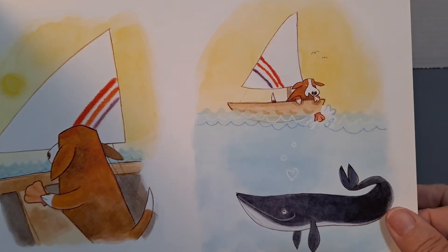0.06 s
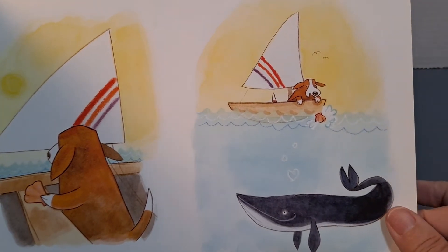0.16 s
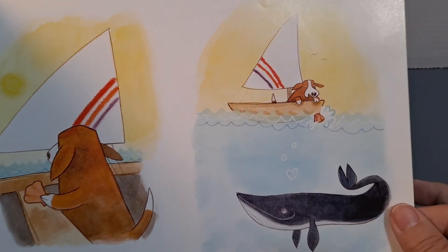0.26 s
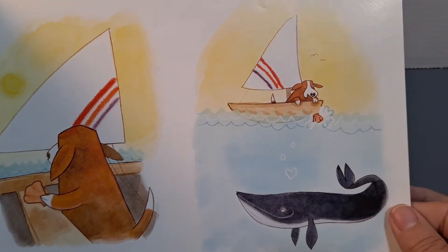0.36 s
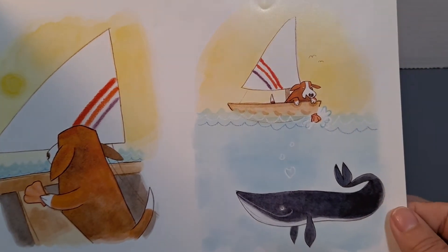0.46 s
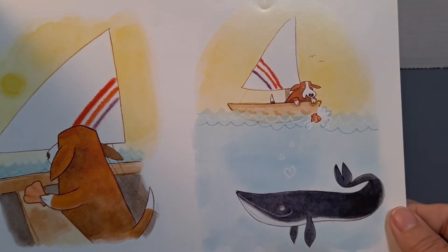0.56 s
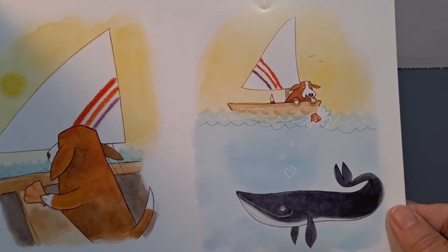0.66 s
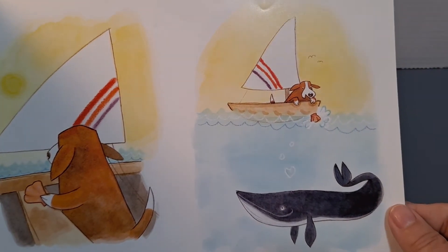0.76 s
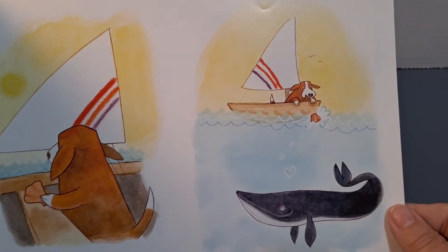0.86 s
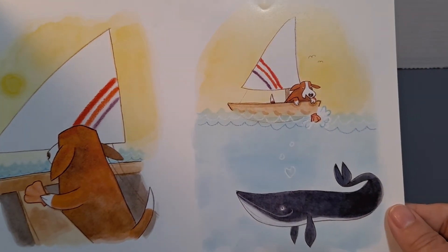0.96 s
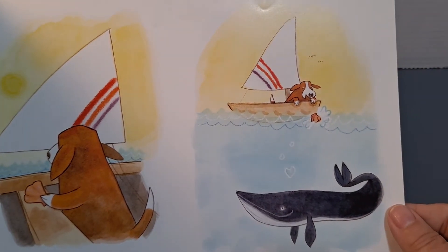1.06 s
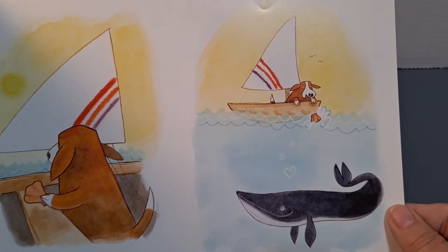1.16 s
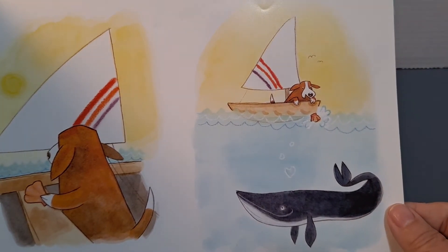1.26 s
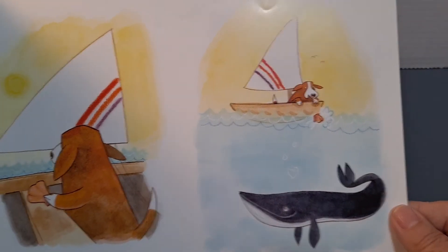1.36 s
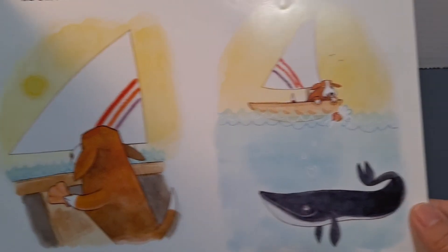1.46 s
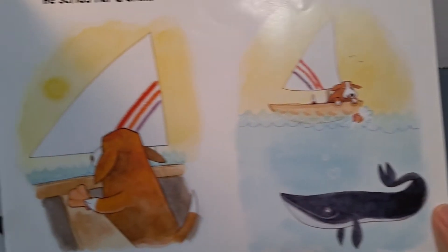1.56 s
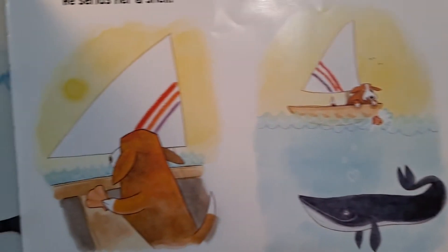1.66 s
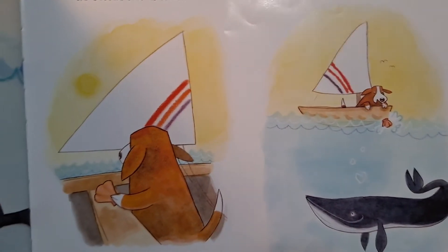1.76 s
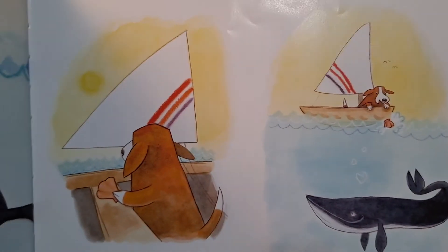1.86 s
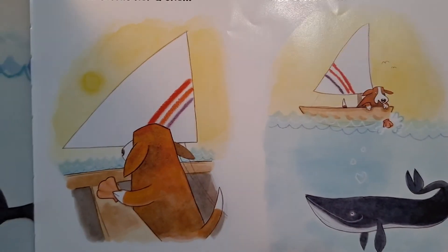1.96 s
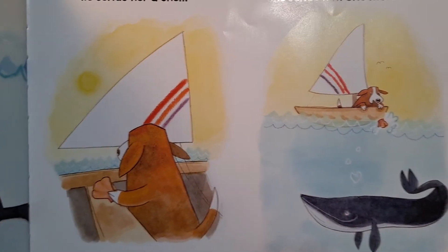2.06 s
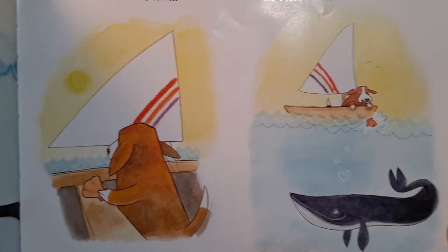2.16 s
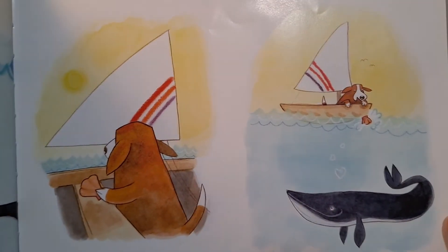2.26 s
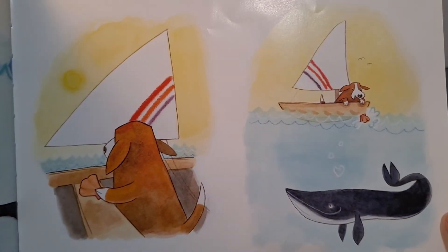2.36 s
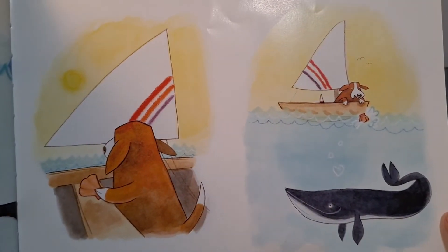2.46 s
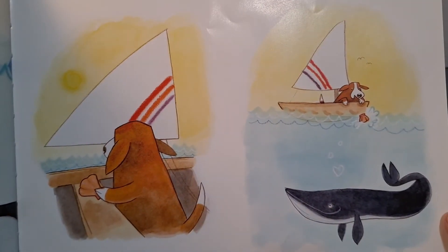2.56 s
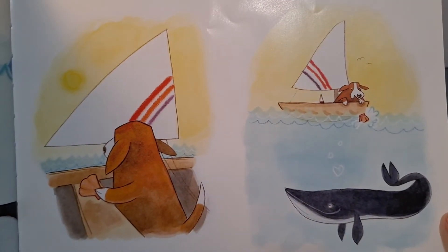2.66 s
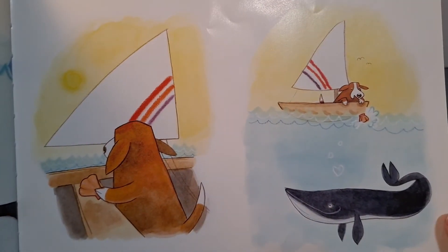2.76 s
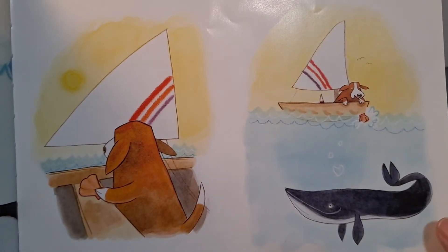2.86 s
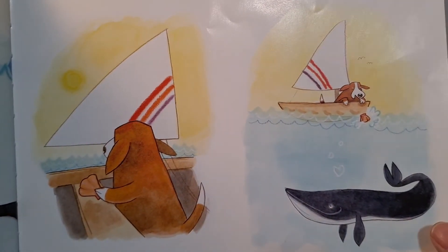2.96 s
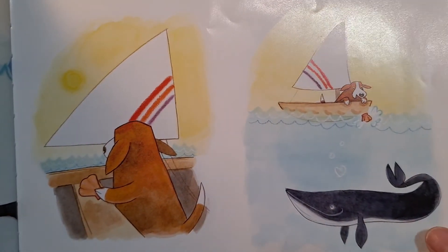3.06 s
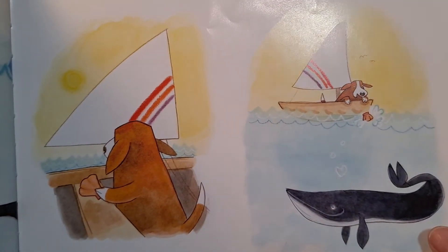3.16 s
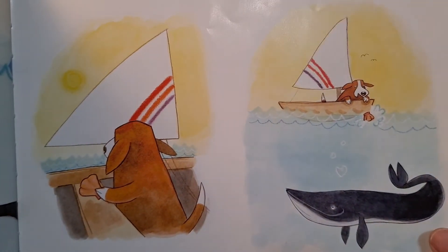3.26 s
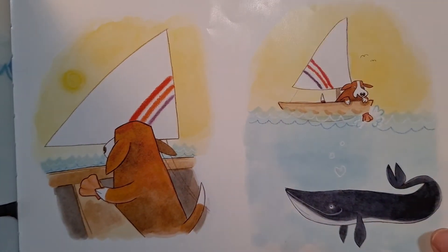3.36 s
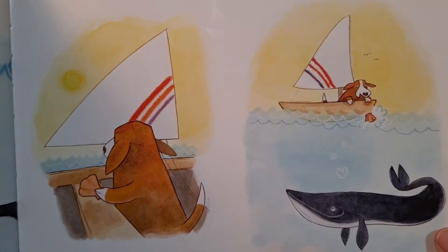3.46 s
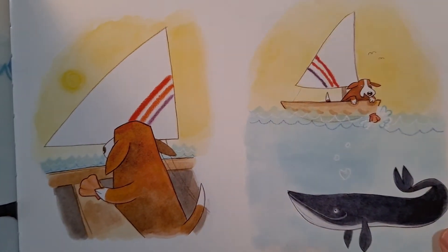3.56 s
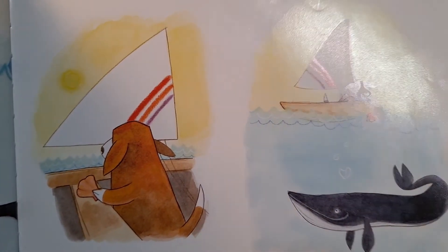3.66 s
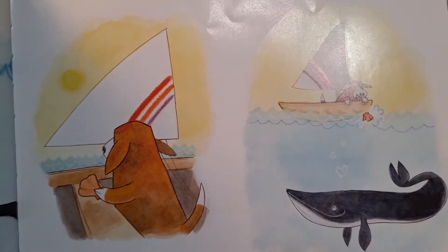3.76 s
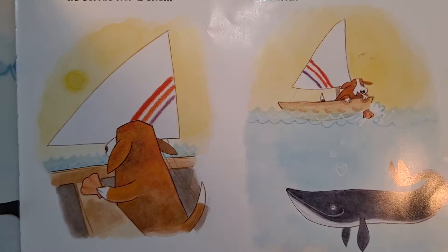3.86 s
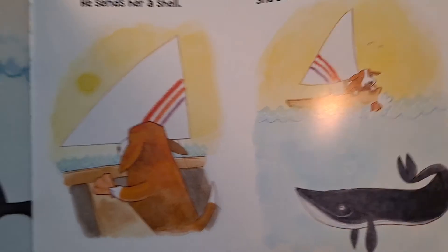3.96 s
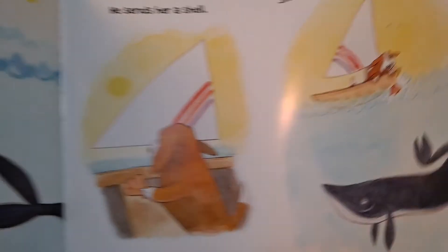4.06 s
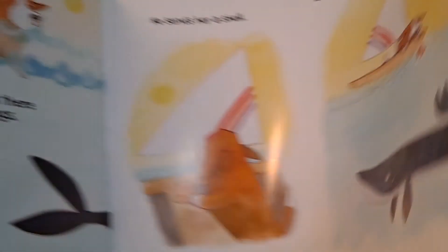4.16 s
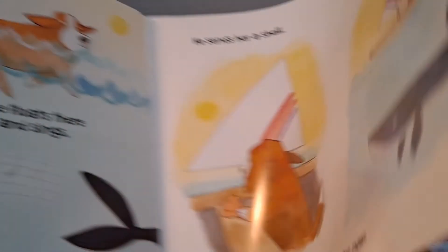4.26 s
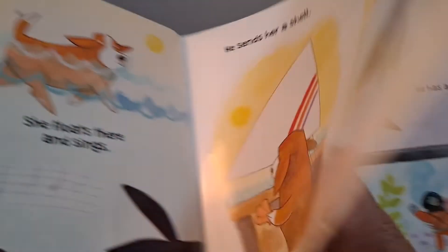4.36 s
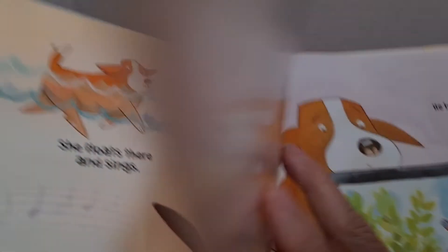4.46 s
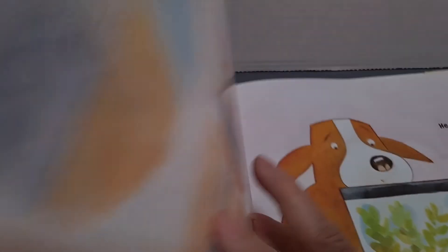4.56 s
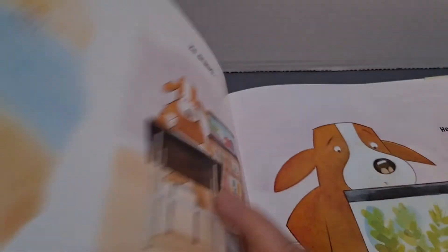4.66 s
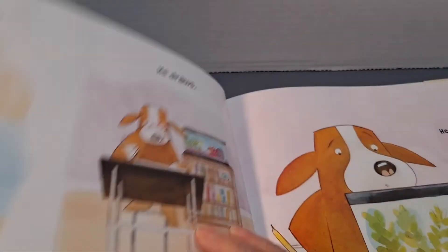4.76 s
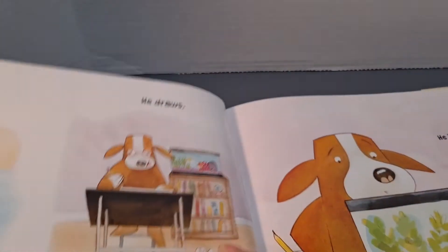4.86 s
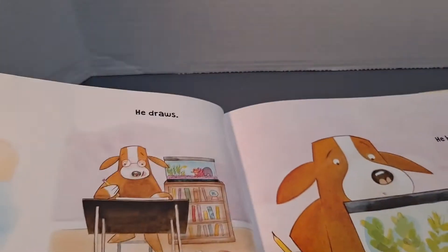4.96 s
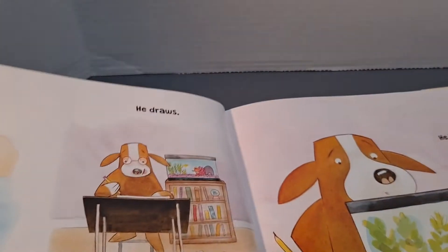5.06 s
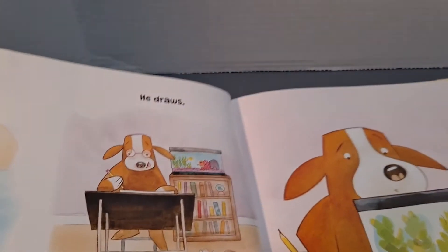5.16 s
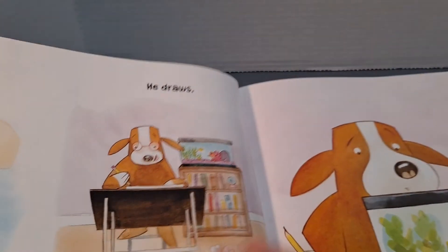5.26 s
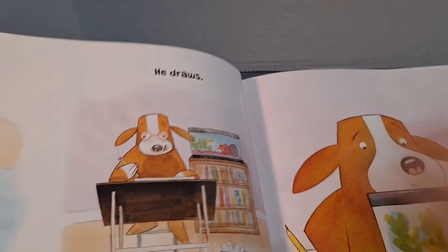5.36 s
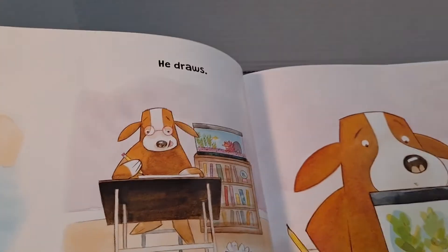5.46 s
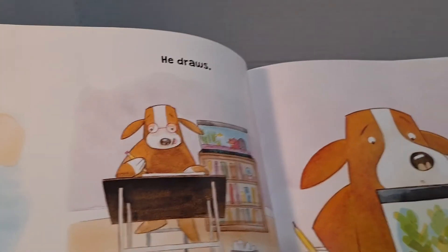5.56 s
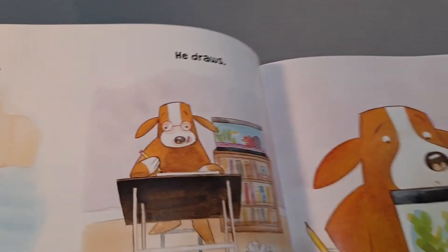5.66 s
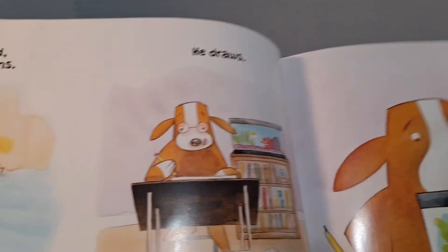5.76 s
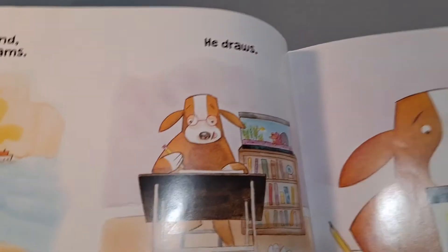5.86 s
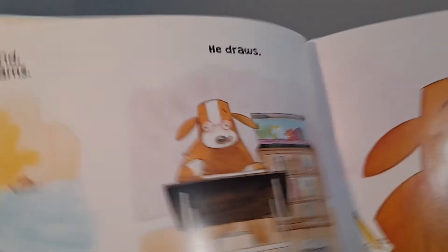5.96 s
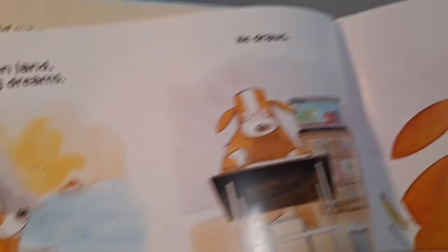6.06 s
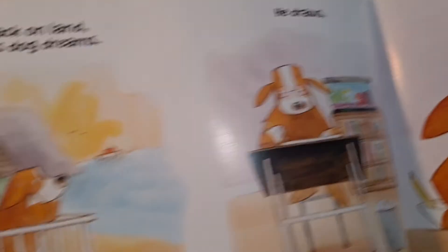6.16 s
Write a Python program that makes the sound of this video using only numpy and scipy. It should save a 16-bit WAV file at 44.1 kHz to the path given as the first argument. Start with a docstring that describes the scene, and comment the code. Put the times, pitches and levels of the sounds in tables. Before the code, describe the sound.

A picture book is handled very close to a stereo microphone in a small quiet room. Quick dry binding ticks come first, then two thin page-edge flicks and a soft paper slide. After a near-silent pause the spine crackles again, pages hiss past each other, and a turn lands with sharp flicks, a low cover thump and papery snaps, settling into faint rustle.

```python
"""A picture book is handled close to a two-port microphone: its binding ticks and creaks, page edges flick
and the cover is thumped. Snaps are short noise bursts that ring resonances; creaks are noise in uneven clumps.
Glossy pages slide over each other with a hiss of filtered noise, and a small room answers the snaps.
Underneath lie the low rumble of the house, a rumble through the microphone stand and the microphone's hiss."""
import sys
import numpy as np
from scipy import signal
from scipy.fft import rfft, irfft, next_fast_len
from scipy.io import wavfile
from scipy.ndimage import uniform_filter1d, map_coordinates

SR = 44100
rng = np.random.default_rng(int(sys.argv[2]) if len(sys.argv) > 2 else 0)


def master_out(mix):
    """Clip the mix to full scale and print it as 16-bit PCM to the path in sys.argv[1]."""
    frames = np.transpose(np.atleast_2d(mix))
    ceiling = np.clip(frames, -1, 1)
    pcm = np.round(ceiling * 32767).astype(np.int16)
    wavfile.write(sys.argv[1], SR, pcm)


N = 274302

# resonances of the binding: (f/Hz, width/Hz, level/dB)
BINDING_MODES = [(832, 140, -3), (1300, 1080, -4.5), (1525, 208, 3.5), (1939, 350, -5), (2430, 190, -0.5),
                 (3030, 230, -3.5)]
# resonances of the cover: (f/Hz, width/Hz, level/dB)
COVER_MODES = [(176, 104, 2.5), (312, 139, 0), (540, 170, -4), (697.5, 56, 1.5), (1094, 150, -2.5)]


def amp(db):
    """Gain of a level in dB."""
    return 10 ** (np.asarray(db) / 20)


def unit(x):
    """x scaled to an average strength (rms) of 1."""
    return x / np.sqrt(np.mean(x ** 2) + 1e-20)


def peak(x):
    """x scaled so that its highest peak is 1."""
    return x / np.abs(x).max()


def along(points, hz):
    """Values at hz, read between (f/Hz, value) points on a log axis."""
    f, v = np.transpose(points)
    return np.interp(np.log(hz + 1), np.log(f + 1), v)


def curves(rows):
    """One value per sample for each column after the time."""
    s, *cols = np.transpose(rows)
    return [np.interp(np.arange(N) / SR, s, c) for c in cols]


def wobble(rate):
    """A smooth random curve through rate random points a second."""
    points = rng.standard_normal(int(N * rate / SR) + 4)
    return map_coordinates(points, [np.arange(N) * rate / SR])


def filtered(x, response):
    """x times a response (real or complex) that depends on frequency."""
    m = next_fast_len(x.shape[-1] + SR // 4)
    spectrum = rfft(x, m) * response(np.fft.rfftfreq(m, 1 / SR))
    return irfft(spectrum, m)[..., :x.shape[-1]]


def modes(table):
    """Response of resonances (f/Hz, width/Hz, level/dB) that ring after a push; their signs alternate."""
    def response(f):
        return sum((-1) ** k * amp(db) * 1j * f * w / (c * c - f * f + 1j * f * w)
                   for k, (c, w, db) in enumerate(table))
    return response


def pair(alike):
    """Left and right white noise that share a part: alike is their correlation."""
    a, b = rng.standard_normal((2, N))
    turn = np.arccos(np.clip(alike, 0, 1)) / 2
    shared, own = np.cos(turn) * a, np.sin(turn) * b
    return np.array([shared + own, shared - own])


def sides(pan_db):
    """Gains of the left and right port; pan_db is left over right."""
    return amp(np.array([pan_db, -pan_db]) / 2)


def strokes(rows):
    """Each stroke rises, holds and dies; their powers add, and the loudest dominates the other columns."""
    step = 64  # samples between computed points
    start, rise, hold, t60, db, *cols = np.transpose(rows)[:, :, None]
    t = np.arange(0, N + step, step) / SR - start
    rising = np.clip(t / np.maximum(rise, .002), 0, 1)
    fall_db = 60 * np.clip(t - rise - hold, 0, 2) / np.maximum(t60, .02)
    power = (rising * amp(db - fall_db)) ** 2 + 1e-14
    total = power.sum(0)

    def full(v):
        return np.interp(np.arange(N), np.arange(len(v)) * step, v)
    return [full(np.sqrt(total))] + [full((power * c).sum(0) / total) for c in cols]


def moving(x, hz_curve, width):
    """x through a broad resonance whose centre moves; width in octaves; loudness kept."""
    hz, t, z = signal.stft(x, SR, nperseg=1024, noverlap=768)
    centre = np.interp(t * SR, np.arange(N), hz_curve)
    z = z / (1 + (np.log2((hz[:, None] + 20) / centre) / width) ** 2)
    out = signal.istft(z, SR, nperseg=1024, noverlap=768)[1][:, :N]

    def loudness(v):
        return np.sqrt(np.abs(uniform_filter1d(np.mean(v ** 2, 0), size=SR // 8)) + 1e-12)
    return out * loudness(x) / loudness(out)


def microphone_hiss():
    """Each port has a nearly independent hiss: noise with a shaped spectrum."""
    # colour of the hiss: (f/Hz, relative level per Hz/dB)
    hiss_colour = [(150, -27), (280, 2), (500, -1.5), (1000, -9), (2000, -12.5), (4000, -15.5), (6500, -21),
                   (10500, -18), (15750, -20.5), (16000, -56.5)]
    return amp(-79) * unit(filtered(pair(0.012), lambda f: amp(along(hiss_colour, f))))


def house_rumble():
    """The house gives a steady low rumble: noise kept mostly in the bass."""
    # colour of the house: (f/Hz, relative level per Hz/dB)
    house_colour = [(12, -74), (20, -27), (40, 1.5), (64, -6), (109, 4.5), (140, -20), (216, -9),
                    (400, -30), (520, -67.5), (880, -120)]
    return amp(-73.0) * unit(filtered(pair(0.68), lambda f: amp(along(house_colour, f))))


def stand_rumble():
    """Rumble through air and hands rings two modes of the stand; it swells when the book is moved."""
    # swells over time: (t/s, low mode level/dB, high mode level/dB)
    swells = [(0.0, -60, -54), (0.67, -64.5, -73.5), (0.71, -60, -62), (0.9, -64.5, -92),
              (0.94, -74.5, -69), (1.4, -58, -71.5), (1.7, -66.5, -68), (2.75, -55, -75),
              (2.79, -70, -73.5), (3.13, -50, -63), (3.22, -57.5, -60.5), (3.45, -63, -58),
              (3.64, -53, -46.5), (3.78, -65, -69), (4.36, -57.5, -58), (4.42, -67, -69), (4.59, -51, -45),
              (4.64, -57, -85), (4.71, -59, -69), (4.85, -43.5, -35.5), (5.37, -65.5, -69),
              (5.61, -61, -60.5), (6.19, -59.5, -58.5), (6.22, -69, -68)]
    # modes of the microphone stand: (f/Hz, width/Hz, level/dB)
    stand_modes = [(60.5, 18.6, 0), (96.8, 37.9, 0)]
    low_db, high_db = curves(swells)
    # left over right is -5.5 dB above a high mode of -41 dB; each dB below it moves 0.26 dB to the right
    pan_db = -5.5 - 0.26 * np.maximum(-41 - high_db, 0)

    def ring(mode):
        return unit(filtered(pair(0.76), lambda f: modes([mode])(f) ** 2))
    stand = amp(low_db) * ring(stand_modes[0]) + amp(high_db) * ring(stand_modes[1])
    return sides(pan_db) * stand


def room(x):
    """The room answers with a tail of noise in which each frequency dies at its own speed."""
    # how fast the room falls silent: (f/Hz, time to fall 60 dB/s)
    decay = [(200, 0.29), (2000, 0.13), (10000, 0.11)]
    hz, t, z = signal.stft(rng.standard_normal((2, SR // 2)), SR, nperseg=256)
    fading = z * amp(-60 * t / along(decay, hz)[:, None])
    tail = signal.istft(fading, SR, nperseg=256)[1]
    later = np.pad(x, ((0, 0), (200, 0)))  # the answer starts 200 samples late
    return signal.fftconvolve(later, tail / np.linalg.norm(tail[0]), axes=1)[:, :N]


def placed(x):
    """Sound from one side reaches the far port later."""
    # where the book sounds: (t/s, delay of the left port/ms; negative is earlier)
    place = [(0, -0.035), (3.3, 0.086), (3.65, 0.093), (4.5, -0.25), (4.8, -0.27), (6.22, -0.11)]
    late = curves(place)[0] * SR / 1000
    return np.array([map_coordinates(x[0], [np.arange(N) - late]), x[1]])


def slide():
    """Page glides on page with a fine friction hiss; a cupped or farther page sounds duller."""
    # strokes: (start t/s, rise/s, hold/s, time to fall 60 dB/s, level/dB, dullness/dB per octave)
    glides = [(0.0, 0.0034, 0.32, 0.61, -70, 3.5), (1.37, 0.004, 0.16, 0.65, -57, 2),
              (1.7, 0.058, 0.074, 0.58, -71, -1.7), (2.05, 0.082, 0.063, 0.44, -60.5, 4.5),
              (2.29, 0.01, 0.017, .8, -70.5, -3), (3.0, 0.4, 0.033, 0.52, -69, 0),
              (3.29, 0.06, 0.12, 0.21, -66, 13.5), (3.56, 0.063, 0.076, 0.11, -56.5, 5),
              (3.72, 0.026, 0.041, 1, -61.5, 0.5), (3.93, 0.12, .05, .6, -49, 2),
              (4.02, 0.2, .2, 0.6, -43.5, -2), (4.48, 0.023, 0.056, 0.67, -49.5, 1.5),
              (4.66, 0.14, .03, 0.27, -52.5, 1), (4.81, 0.087, 0.014, 0.36, -48, 5),
              (5.0, 0.0056, 0.013, 0.27, -35, 1), (5.16, 0.03, 0.081, 0.64, -56.5, 1.5),
              (5.545, 0.0078, 0.2, 0.9, -55.5, 1), (5.85, 0.12, .3, 0.26, -49, 0.5)]
    # colour of the paper: (f/Hz, relative level per Hz/dB)
    paper = [(410, -14), (700, -4), (1360, -4), (2700, 2.5), (3900, -0.9), (9500, -0.2), (11000, -7),
             (14000, 1.5), (15750, 1.5), (16050, -55)]
    gain, dull_db = strokes(glides)
    grain = amp(0.61 * wobble(40) + 0.8 * wobble(330))
    friction = unit(filtered(pair(0.051) * grain, lambda f: amp(along(paper, f))))
    hz, t, z = signal.stft(friction, SR, nperseg=512)
    octaves = np.log2(np.maximum(hz[:, None], 2800) / 7000)  # from 7 kHz
    slope_db = np.interp(t * SR, np.arange(N), dull_db) * octaves
    # the contact patch keeps changing, so the colour flutters
    field = uniform_filter1d(rng.standard_normal(z.shape[1:]), size=7, axis=0)
    field = uniform_filter1d(field, size=12, axis=1)
    hiss = signal.istft(z * amp(1.7 * unit(field) - slope_db), SR, nperseg=512)[1][:, :N]
    return gain * sides(0.8)[:, None] * hiss


def strain():
    """Glue and thread slip in uneven clumps that ring the binding; the hands shake the cover.

    The grip picks the modes, so a moving resonance selects among them."""
    # pushes of the hands: (start t/s, rise/s, hold/s, time to fall 60 dB/s, creak level/dB,
    # creak f/Hz, cover shake level over the creak/dB, shake f/Hz)
    pushes = [(0.0, 0.0033, 0.28, 0.44, -60.5, 1690, 0, 360), (1.39, 0.067, .22, 0.69, -73, 2130, -15, 440),
              (1.76, 0.005, 0.018, 0.38, -76.5, 2050, 7, 570), (2.04, 0.022, 0.036, 1, -75, 2100, -1, 538),
              (3.05, 0.34, 0.031, 0.47, -69.5, 1950, -8, 302), (3.27, 0.17, 0.063, 0.18, -60, 1700, 9, 460),
              (3.55, 0.08, 0.071, 0.083, -60, 1530, 11.5, 465),
              (3.74, 0.061, 0.31, 0.16, -66, 1890, -17.5, 378),
              (4.0, .11, 0.52, 0.33, -67.5, 1800, 4.5, 554), (4.53, 0.028, .04, 0.22, -64, 1600, 9, 300),
              (4.74, 0.15, .02, 0.18, -52, 1200, 0, 664), (4.82, 0.042, .1, 0.43, -56, 1290, 9, 650),
              (5.0, 0.0083, 0.088, 0.24, -60, 2150, 3.5, 526),
              (5.17, 0.051, 0.056, 0.083, -51, 1190, -1, 676),
              (5.26, 0.016, 0.023, 0.33, -55.5, 2210, -8, 613),
              (5.36, 0.0083, 0.023, 0.24, -61.5, 1570, 3.5, 700),
              (5.58, 0.091, 0.088, 0.11, -62, 1970, -7, 430), (5.86, 0.014, 0.34, .2, -62.5, 1670, -4, 420)]
    gain, creak_hz, shake_db, shake_hz = strokes(pushes)
    slips = amp(2.2 * wobble(90) + 3.2 * wobble(600) + 0.8 * wobble(14))
    creak = unit(filtered(pair(.4) * slips, modes(BINDING_MODES)))
    creak = moving(creak, creak_hz, width=.23)
    shake = unit(filtered(pair(.7) * amp(3.5 * wobble(40)), modes(COVER_MODES)))
    shake = moving(shake, shake_hz, width=.4)
    return gain * (creak + amp(shake_db) * shake)


def struck(jolt, table, hz):
    """A jolt rings the modes of a book part, mostly those near hz."""
    near = modes([(hz, .45 * hz, 0)])
    return peak(filtered(jolt, lambda f: modes(table)(f) * near(f)))


def snap(crack_db, crack_hz, t60, binding_db, binding_hz, cover_db, cover_hz):
    """One snap: a dying crack of noise, and a jolt that rings binding and cover near their given pitches."""
    t = np.arange(SR // 8) / SR
    noise = rng.standard_normal((6, len(t)))
    t60 = max(t60, .003)
    fall = amp(-60 * t / t60) * (1 - np.exp(-t / (.03 * t60)))
    fall = fall + .05 / max(t60, .018) * amp(-60 * t / .002)  # a sharp first edge
    band = modes([(crack_hz, .9 * crack_hz, 0)])
    burst = (noise[:2] + 0.5 * noise[2]) * fall  # the ports share a part
    # the second factor takes out the bass
    crack = filtered(burst, lambda f: band(f) * f / (f - .6j * crack_hz))
    jolt = (0.28 * noise[3:5] + noise[5]) * amp(-60 * t / (0.89 * t60))
    jolt[:, 0] += 9  # a single hard push at the start
    binding = amp(binding_db) * struck(jolt, BINDING_MODES, binding_hz)
    cover = amp(cover_db) * struck(jolt, COVER_MODES, cover_hz)
    return amp(crack_db) * peak(crack) + (binding + cover)


def snaps():
    """Glue ticks in the binding, page edges flick and the cover is thumped, each as one snap."""
    # ticks of glue: (t/s, binding level/dB, binding f/Hz, crack level over it/dB, time to fall 60 dB/s)
    ticks = [(0.041, -43.5, 1600, -8, 0.049), (0.0819, -37.5, 1600, -9, 0.058),
             (0.0964, -61, 1620, -3, 0.022), (0.1208, -32, 1730, -6, 0.025), (0.175, -28, 1610, -3, 0.018),
             (0.226, -32.5, 1500, -5.5, 0.029), (0.2311, -44.5, 1510, -3, 0.014),
             (0.2453, -44, 1320, 0, 0.032), (0.2628, -39, 1340, -3, 0.031), (0.2721, -43.5, 1510, 5, 0.02),
             (0.2846, -47, 1560, -17, 0.034), (0.2927, -42.5, 1200, -1, 0.03),
             (0.3142, -45, 1580, -16, 0.025), (0.3814, -46, 1670, 1, 0.018),
             (3.2839, -52.5, 1480, 2, 0.044), (3.3271, -46, 1940, 0, 0.022), (3.3669, -30, 1960, 1, 0.019),
             (3.3977, -49, 1830, -15, 0.022), (3.4142, -41.5, 1770, -0.5, 0.027),
             (3.4378, -39.5, 1880, -2, 0.026), (3.4463, -42, 1690, -7, 0.034),
             (3.4643, -35.5, 1740, -2, 0.02), (3.493, -33, 1720, 0, 0.025), (3.5259, -26, 1590, -5.5, 0.03),
             (3.5695, -24.5, 1620, -3.5, 0.013), (3.5855, -45, 1530, -3, 0.016),
             (3.5956, -28.5, 1540, -2, 0.038), (3.6287, -24, 1480, -8.5, 0.011),
             (3.6403, -29, 1480, -19, 0.022), (3.6521, -25, 1470, -12, 0.018),
             (5.2568, -37, 1610, -21, 0.022), (5.2661, -39, 1690, -11, 0.022),
             (5.2778, -51, 1630, -3, 0.022), (5.284, -35, 1750, -10, 0.026),
             (5.2954, -39.5, 2380, -1, 0.036)]
    # flicks of a page edge: (t/s, crack level/dB, crack f/Hz, time to fall 60 dB/s, binding over it/dB)
    flicks = [(1.283, -50.5, 12000, .02, -37), (1.3334, -40, 14100, .035, -28),
              (1.3424, -23, 14200, .02, -32), (1.3776, -20, 3430, .018, -40),
              (2.4055, -47, 7240, .032, -34), (2.841, -55, 3600, .05, -35), (3.678, -33.5, 5260, .03, -10),
              (3.8937, -35.5, 8050, .018, -22), (4.4695, -18, 6110, .012, -9.5),
              (4.4764, -34, 9000, .015, -25), (4.4838, -19.5, 7700, .011, -31),
              (4.4975, -29, 2820, .04, -6), (4.5969, -19.5, 14200, .018, -37),
              (4.642, -19.5, 9800, .035, -13), (5.0015, -11, 11800, .03, -4.5),
              (5.0088, -12.5, 8320, .02, -16.5), (5.047, -27, 9350, .02, -13.5),
              (5.0906, -37, 2800, .017, -7.5), (5.1755, -35, 15100, .025, -23),
              (5.5456, -25, 3250, .032, -10), (5.711, -38.5, 5140, .031, -15), (5.858, -38.5, 3020, .05, 6),
              (5.8994, -32, 2920, .02, -3), (5.942, -35.5, 2540, .029, 0.5),
              (6.1583, -28.5, 4670, .022, -10.5)]
    # thumps on the cover: (t/s, cover level/dB, cover f/Hz, binding level over it/dB, binding f/Hz,
    # crack level over the cover/dB, time to fall 60 dB/s)
    thumps = [(1.778, -63, 608, -3, 2190, -1, 0.026), (2.027, -59.5, 188, -13, 1030, -10, 0.058),
              (3.356, -54, 544, 8, 1830, -14, 0.032), (3.737, -42, 298, -15, 2040, -4, 0.025),
              (4.529, -27, 446, 3.5, 970, 9, 0.0097), (4.537, -44.5, 700, 3, 1010, 12, .04),
              (4.576, -38.5, 192, -24, 1497, -17, 0.067), (4.807, -17.5, 720, -9, 1240, -15, 0.053),
              (4.887, -29.5, 617, 2.5, 1780, -7, 0.1), (4.916, -29, 630, -10, 1140, -9, 0.036),
              (4.996, -35, 157, -17, 2090, -10, 0.13), (5.212, -44, 676, -4, 1140, -8, 0.073),
              (5.59, -43.5, 200, -7, 2110, -10, 0.022), (5.86, -50.5, 196, -11, 2310, -12, 0.089)]
    tick_crack_hz, thump_crack_hz, flick_binding_hz = 2780, 3000, 2100
    tick_cover_db, flick_cover_db = -10.5, -29  # cover over the binding of a tick, over the crack of a flick

    def anywhere():
        # ticks and flicks ring the cover at a random pitch in Hz
        return np.exp(rng.uniform(*np.log((192.5, 600))))
    rows = []
    for s, db, hz, over, t60 in ticks:
        rows.append((s, db + over, tick_crack_hz, t60, db, hz, db + tick_cover_db, anywhere()))
    for s, db, hz, t60, over in flicks:
        rows.append((s, db, hz, t60, db + over, flick_binding_hz, db + flick_cover_db, anywhere()))
    for s, db, low_hz, over, hz, crack, t60 in thumps:
        rows.append((s, db + crack, thump_crack_hz, t60, db + over, hz, db, low_hz))
    out = np.zeros((2, N + SR))
    for s, *settings in rows:
        sound = sides(2.5)[:, None] * snap(*settings)
        start = round(s * SR)
        out[:, start:start + sound.shape[1]] += sound
    return out[:, :N]


def scene():
    """The book in its room, over rumble and hiss."""
    hits = snaps()
    book = placed(hits + strain()) + amp(-9.0) * room(hits) + slide()
    return book + stand_rumble() + house_rumble() + microphone_hiss()


def record(dry):
    """The whole sound, low-passed: nothing is left above 16979 Hz."""
    return filtered(dry, lambda hz: hz < 16979)


dry = scene()
out = record(dry)
master_out(out)
```